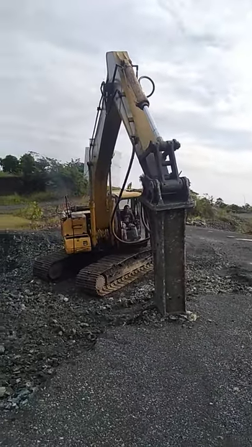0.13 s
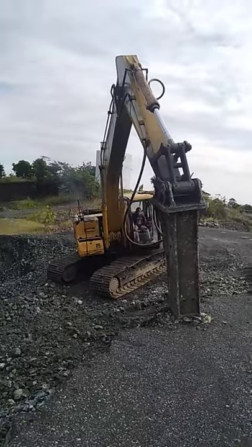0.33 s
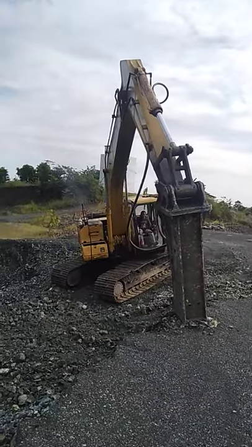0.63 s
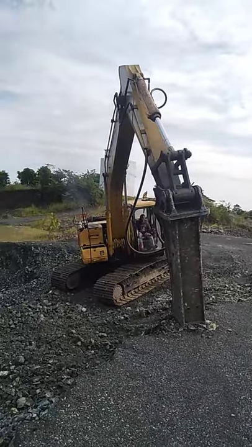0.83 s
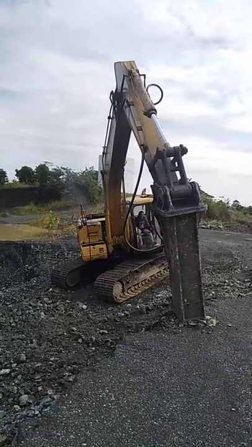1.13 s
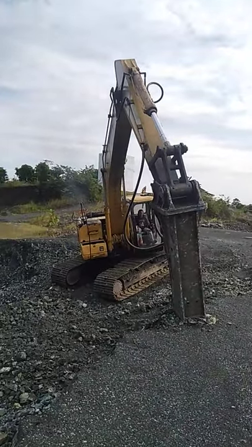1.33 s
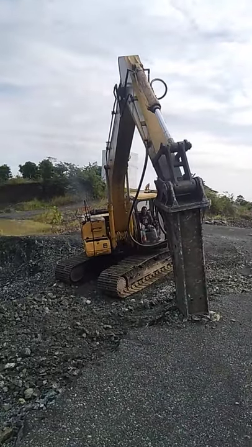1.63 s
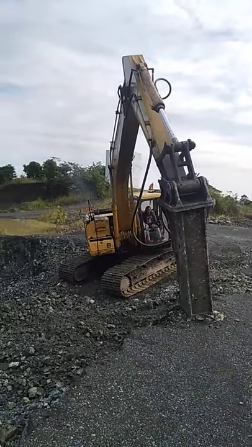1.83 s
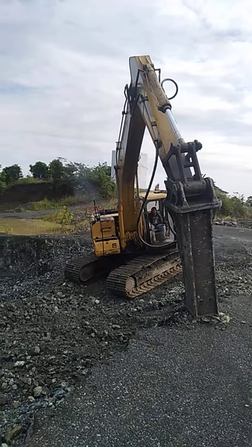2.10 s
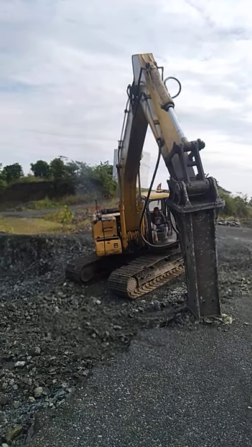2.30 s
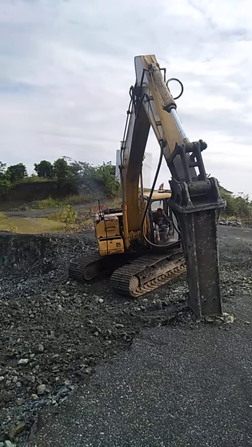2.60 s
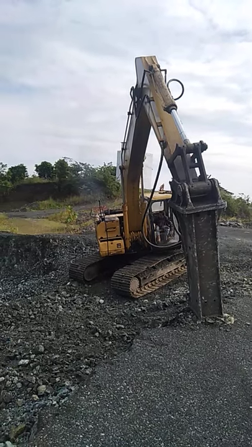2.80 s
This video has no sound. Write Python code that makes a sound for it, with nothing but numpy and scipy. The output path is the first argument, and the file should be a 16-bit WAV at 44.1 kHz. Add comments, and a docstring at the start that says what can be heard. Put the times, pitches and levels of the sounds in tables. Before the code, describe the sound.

Close by in an open quarry, an excavator's rock breaker pounds with rapid metallic clangs and short echoes. Early on the stone splits, metal clanks once, and the hammering continues lower, with hydraulic hiss and a diesel running underneath.

```python
"""Rock breaker in an open quarry

One microphone, near enough to catch the oil hiss, hears an excavator's hydraulic breaker strike about
6.6 blows a second over its diesel. Each cycle a valve opens, the piston rushes down, steel and housing
ring, and the quarry answers. Perched on hard rock, the chisel rings brightly at first; then the rock
cracks, the linkage clanks, and the bedded chisel sounds deeper."""
import sys
import numpy as np
from scipy import signal
from scipy.fft import rfft, irfft
from scipy.io import wavfile
from scipy.ndimage import uniform_filter1d, minimum_filter1d

SR = 44100
rng = np.random.default_rng(int(sys.argv[2]) if len(sys.argv) > 2 else 0)


def transcribe(u):
    """Save the signal u as a 16-bit wav file named by the first command-line argument.

    u: samples, shape (n,) or (channels, n), limited to [-1, 1]; the rate is SR.
    q: integer samples, one column per channel.
    """
    v = np.clip(np.atleast_2d(u).T, -1, 1)
    q = np.round(v * 32767).astype(np.int16)
    wavfile.write(sys.argv[1], SR, q)


N = 130095
TIME = np.arange(N) / SR
AGE = TIME[:SR // 2]  # seconds into one blow

# Noise of diesel, fan and pump: frequency_hz, density_db (relative, per Hz, as in every spectrum)
ENGINE_SPECTRUM = [(20, -24), (45, -3.5), (90, -6.5), (170, 1.5), (300, -4), (500, 1), (700, 4.5),
                   (1000, 0), (1600, -4.5), (2350, 0), (3100, -9), (4200, -18.5), (5200, -20.5),
                   (7000, -13.5), (9500, -26), (12000, -28), (13500, -19.5), (16000, -20)]
# Steady diesel orders: pitch_hz, level_db
ENGINE_ORDERS = [(41.7, -58), (83.4, -59), (166.8, -50.5)]
# The rock splits and crumbles: start_s, level_db, rise_s, t60_s
ROCK_CRACKS = [(0.626, -25, 0.0082, 0.22), (.668, -11, 0.019, 0.15), (0.814, -29.5, .01, 0.37),
               (0.97, -22, 0.012, 0.26), (1.119, -26, 0.007, 0.1)]
# Fracturing stone: frequency_hz, density_db
STONE_SPECTRUM = [(80, -14), (300, -8), (520, -4), (730, 1.5), (900, -6.5), (1150, -2.5), (1400, -7),
                  (1900, -0.5), (2800, -5), (3500, -13), (4600, -15), (5500, -25.5), (16000, -45)]
# Modes of the linkage: pitch_hz, level_db, t60_s
LINKAGE_MODES = [(669, -29, 0.11), (728, -18.5, 0.21), (823, -25, 0.19), (1120, -27, 0.29),
                 (1860, -26, 0.16)]
# Course of the valve whistle: time_s, pitch_hz, level_db
WHISTLE_TRACK = [(0, 12950, -65), (.3, 12860, -57), (.44, 12930, -57), (.7, 12750, -68), (1.6, 12680, -62),
                 (2.95, 12720, -60)]
# Oil through the valve: frequency_hz, density_db
OIL_SPECTRUM = [(500, -5), (1800, -13), (3000, 6.5), (4200, 4.5), (5200, -10), (7100, 3), (9500, -10),
                (12000, -10.5), (13000, -2), (14300, -1), (16000, -2.5)]
# The piston's downstroke: frequency_hz, density_db
RUSH_SPECTRUM = [(60, -4), (180, -5), (450, 1), (800, -3.5), (1300, -11.5), (1950, -11), (2350, -3.5),
                 (2800, -14), (3500, -13.5), (5000, -25.5), (7000, -21.5), (11000, -34.5), (14500, -26)]
# Loose rock under the chisel: frequency_hz, density_db
THUD_SPECTRUM = [(60, -12), (110, -9), (200, -0.5), (290, -6), (400, -7.5), (550, -8), (720, -2),
                 (1000, -14.5), (2000, -20), (8000, -65)]
# Tail thrown back by machine and quarry: frequency_hz, density_db
TAIL_SPECTRUM = [(60, -17), (350, -24.5), (720, 6.5), (950, -8), (1200, 3.5), (1600, -6), (2350, 0),
                 (3100, -16), (4200, -13), (5500, -28), (16000, -41)]
# The ring coming back off machine and rock face: delay_s, gain_db
RING_REFLECTIONS = [(.0305, -26.5), (0.0397, -19.5), (0.0506, -22)]
# Modes of chisel, housing and boom: pitch_hz, t60_s, perched_db, bedded_db, lag_s
STEEL_MODES = [(87.4, 0.13, -37, -38.5, -0.0077), (167.1, .16, -43, -25.5, -0.0038),
               (203, 0.049, -23, -16.5, .002), (321, 0.049, -26, -15.5, -.0066),
               (444.6, 0.1, -29, -30.5, -.003), (707.3, 0.052, -19, -20, 0), (897, 0.04, -42, -18.5, .001),
               (1098.5, 0.061, -23, -10, .0002), (1174, .12, -20.5, -24, .001),
               (1275, 0.25, -55, -30, .003), (1390, 0.11, -56, -31.5, .002), (1755, .05, -32, -14.5, .003),
               (1926, 0.034, -26, -34, .001), (2240, 0.088, -25.5, -28.5, .001),
               (2390, 0.073, -35, -24, -0.0032), (2469, 0.03, -17.5, -34, -.0005),
               (2604, 0.048, -13.5, -28, -.0005), (2840, 0.033, -17.5, -38, 0.0048),
               (3440, 0.088, -33, -44, 0), (3604, 0.091, -34.5, -35.5, 0), (4390, 0.076, -42, -41, 0)]
# Dense clang of steel on stone: frequency_hz, perched_density_db, bedded_density_db
CLANG_SPECTRA = [(60, -34, -28), (250, -18, -8.5), (660, 3, -4), (1220, -0.5, 1.5), (1500, 1.5, -4.5),
                 (2070, -4, -8), (2670, -3, -6.5), (3400, -20, -11.5), (4300, -13.5, -15.5),
                 (5400, -36, -26.5), (6830, -26, -20), (9900, -50, -33), (16000, -45, -36)]
# Piston blows: start_s, strength_db, seat (0 perched to 1 bedded), thud_db
PISTON_BLOWS = [(-.012, -1.5, 0.07, -36), (0.1381, 0, 0.03, -24.5), (0.2903, 0.5, 0.04, -44),
                (0.4411, 0, 0.1, -33.5), (0.5956, 0, 0.48, -23.5), (0.799, 0, 0.66, -18),
                (0.9553, 1.5, 0.86, -14), (1.1088, 0, 0.86, -20.5), (1.2625, 1.5, .95, -23.5),
                (1.417, 0, 0.99, -24), (1.5681, -1.5, 1, -30), (1.719, 0.5, 1, -26), (1.8702, 1.5, 1, -35),
                (2.0214, 1.5, 0.94, -30), (2.1725, 1, 0.93, -44), (2.3234, 0, 0.97, -33),
                (2.475, 0, 0.99, -29), (2.6266, 0.5, 1, -35), (2.7776, -.5, 0.98, -36),
                (2.9289, -0.5, 0.96, -45)]


def from_db(db):
    """Decibels to gain."""
    return 10 ** (np.asarray(db) / 20)


def rms_one(x):
    """Scale to unit rms."""
    return x / np.sqrt(np.mean(x ** 2) + 1e-20)


def colour(x, spectrum):
    """Give x a spectrum of (Hz, dB) points, rolling off below the first; rms 1."""
    hz, db = np.transpose(spectrum)
    bins_hz = np.maximum(np.fft.rfftfreq(len(x), 1 / SR), 1)
    gain = from_db(np.interp(np.log(bins_hz), np.log(hz), db)) * np.minimum(bins_hz / hz[0], 1)
    return rms_one(irfft(rfft(x) * gain, len(x)))


def noise(spectrum, size=N):
    """Coloured noise, rms 1."""
    return colour(rng.standard_normal(size), spectrum)


def burst(age, rise_s, t60_s):
    """Envelope that rises and dies away; zero before age 0."""
    age = np.maximum(age, 0)
    return (1 - np.exp(-age / rise_s)) * np.exp(-np.log(1000) * age / t60_s)


def wavering(hz, waver_hz):
    """A tone whose pitch wanders at random; rms 1."""
    wander = rms_one(uniform_filter1d(rng.standard_normal(N), int(SR / (4 * waver_hz))))
    return np.sqrt(2) * np.sin(2 * np.pi * np.cumsum(hz + waver_hz * wander) / SR)


def add(out, start_s, sound):
    """Mix a sound in at start_s."""
    i = int(start_s * SR)
    part = sound[max(-i, 0):max(N - i, 0)]
    out[max(i, 0):max(i, 0) + len(part)] += part


def treble_ripple(x, spread_db=2.5, spacing_hz=90, above_hz=2000):
    """A fine, fixed random ripple gives the treble a slightly ringing colour."""
    knots_hz = np.arange(0, SR / 2, spacing_hz)
    ripple_db = spread_db * rng.standard_normal(len(knots_hz)) * (knots_hz > above_hz)
    gain = from_db(np.interp(np.fft.rfftfreq(N, 1 / SR), knots_hz, ripple_db))
    return irfft(rfft(x) * gain, N)


def engine():
    """Behind everything, steady diesel orders sit in the noise of fan and pump."""
    roar = from_db(-37.5) * noise(ENGINE_SPECTRUM)
    return roar + sum(from_db(db) * wavering(hz, waver_hz=1.44) for hz, db in ENGINE_ORDERS)


def rock(chips_per_s=3500):
    """The rock gives way in showers of small fractures, each a click."""
    clicks = (rng.random(N) < chips_per_s / SR) * rng.choice([-1, 1], N)
    size_db = np.minimum(rng.exponential(1, N), 3)
    showers = sum(from_db(db) * burst(TIME - start_s, rise_s, t60_s)
                  for start_s, db, rise_s, t60_s in ROCK_CRACKS)
    return treble_ripple(colour(clicks * from_db(size_db), STONE_SPECTRUM) * showers)


def linkage(start_s=0.701, rise_s=0.004):
    """The linkage clanks once as the chisel drops into the split."""
    age = TIME - start_s
    return sum(from_db(db) * burst(age, rise_s, t60_s) * np.sin(2 * np.pi * hz * age)
               for hz, db, t60_s in LINKAGE_MODES)


def valve_whistle(flow, follow_share=0.41):
    """A thin, high whistle whose level partly follows the oil flow."""
    time_s, hz, db = np.transpose(WHISTLE_TRACK)
    tone = wavering(np.interp(TIME, time_s, hz), waver_hz=110)
    return from_db(np.interp(TIME, time_s, db)) * tone * (1 + follow_share * (rms_one(flow) - 1))


def hydraulics(valve_lead_s=0.068, flow_lead_s=0.033, flow_end_s=0.0093,
               rush_swell_s=0.013, rush_end_s=0.0026):
    """Ahead of each blow the valve spits, oil hisses through and the piston rushes down."""
    flow, rush = np.zeros(N), np.zeros(N)
    for start_s, strength_db, _, _ in PISTON_BLOWS:
        before, after = np.maximum(start_s - TIME, 0), np.maximum(TIME - start_s, 0)
        flow += from_db(-36.5) * burst(TIME - start_s + valve_lead_s, rise_s=0.0031, t60_s=0.14)
        flow += from_db(-47.5) * (before < flow_lead_s) * np.exp(-after / flow_end_s)
        rush += from_db(strength_db - 27) * np.exp(-before / rush_swell_s - after / rush_end_s)
    whistle = valve_whistle(flow)
    return treble_ripple(flow * noise(OIL_SPECTRUM) + rush * noise(RUSH_SPECTRUM)) + whistle


def steel_ring(seat, scatter_db=0.8, rise_cycles=0.5):
    """Chisel, housing and boom ring from one blow; yields each mode and reflection as (lag_s, sound)."""
    for hz, t60_s, perched_db, bedded_db, lag_s in STEEL_MODES:
        level_db = perched_db + seat * (bedded_db - perched_db) + scatter_db * rng.standard_normal()
        mode = from_db(level_db) * burst(AGE, rise_cycles / hz, t60_s) * np.sin(2 * np.pi * hz * AGE)
        yield lag_s, mode
        for delay_s, gain_db in RING_REFLECTIONS:
            yield lag_s + delay_s, from_db(gain_db) * mode


def seat_blend(perched, bedded, seat, fresh, fresh_share):
    """Blend two repeating ring patterns by the chisel's seat; a share of the power is new each blow."""
    repeating = np.sqrt(1 - seat) * perched + np.sqrt(seat) * bedded
    return np.sqrt(1 - fresh_share) * repeating + np.sqrt(fresh_share) * fresh


def hammer(thud_lead_s=0.0053, echo_delay_s=0.035):
    """Each blow thuds, clangs and rings; the quarry's tail and the rock face's echo follow it."""
    out, size = np.zeros(N), len(AGE)
    hz, perched_db, bedded_db = np.transpose(CLANG_SPECTRA)
    clangs = noise(np.c_[hz, perched_db], size), noise(np.c_[hz, bedded_db], size)
    tails = noise(TAIL_SPECTRUM, size), noise(TAIL_SPECTRUM, size)
    thud_shape = burst(AGE, rise_s=0.0017, t60_s=0.087)
    clang_shape = from_db(-18.5) * burst(AGE, rise_s=0.0004, t60_s=0.067)
    quarry = burst(AGE, rise_s=0.01, t60_s=0.3)
    rock_face = burst(AGE - echo_delay_s, rise_s=0.0033, t60_s=0.097)
    tail_shape = from_db(-28.5) * np.hypot(quarry, rock_face)
    for start_s, strength_db, seat, thud_db in PISTON_BLOWS:
        add(out, start_s - thud_lead_s, from_db(thud_db) * thud_shape * noise(THUD_SPECTRUM, size))
        fresh_clang = noise(np.c_[hz, perched_db + seat * (bedded_db - perched_db)], size)
        clang = clang_shape * seat_blend(*clangs, seat, fresh_clang, fresh_share=0.22)
        tail = tail_shape * seat_blend(*tails, seat, noise(TAIL_SPECTRUM, size), fresh_share=0.42)
        add(out, start_s, from_db(strength_db) * (clang + tail))
        for lag_s, mode in steel_ring(seat):
            add(out, start_s + lag_s, from_db(strength_db) * mode)
    return out


def scene():
    """The breaker, the rock and the engine meet at one microphone."""
    return (hammer() + hydraulics() + rock() + linkage() + engine())[None]


def record(dry, low_cut_hz=37, high_cut_hz=15800, threshold=0.365, attack_s=0.0004, release_db_per_s=310):
    """The microphone drops the lowest rumble, a fast limiter holds the blows down, the top is cut."""
    mic = signal.sosfilt(signal.butter(2, low_cut_hz, "high", fs=SR, output="sos"), dry)
    over_db = np.maximum(20 * np.log10(np.abs(mic[0]) / threshold + 1e-9), 0)
    release_db = release_db_per_s * TIME
    gain_db = release_db - np.maximum.accumulate(over_db + release_db)
    width = int(attack_s * SR)
    # The gain eases down just ahead of each peak.
    eased_db = uniform_filter1d(minimum_filter1d(gain_db, 2 * width + 1), width)
    high_cut = signal.ellip(12, 0.1, 80, high_cut_hz, fs=SR, output="sos")
    return signal.sosfilt(high_cut, mic * from_db(eased_db))


dry = scene()
out = record(dry)
transcribe(out)
```